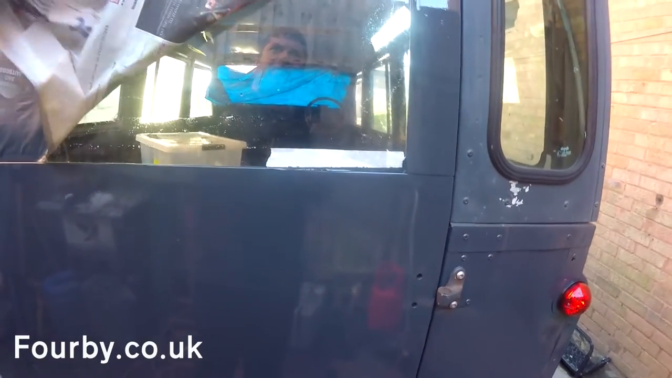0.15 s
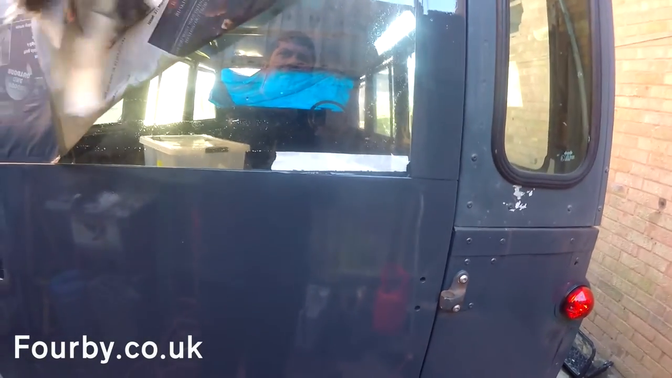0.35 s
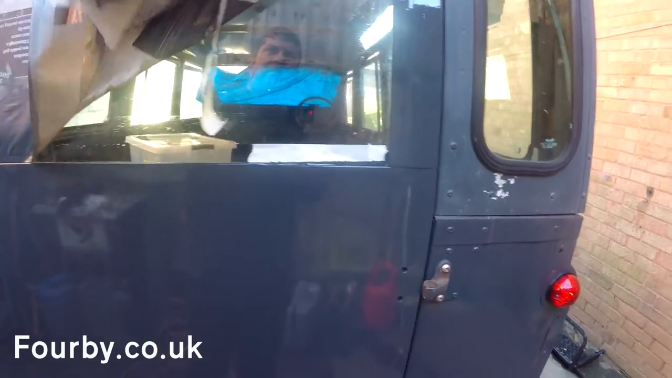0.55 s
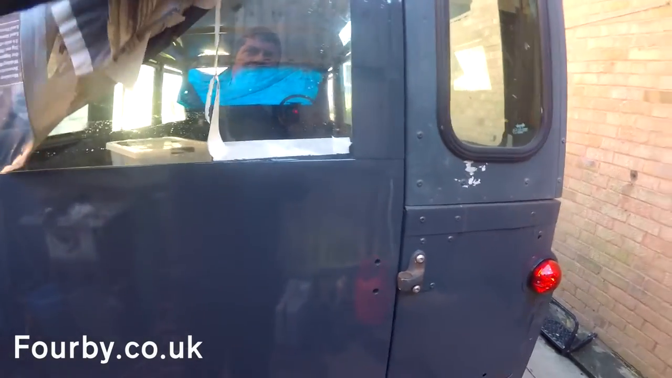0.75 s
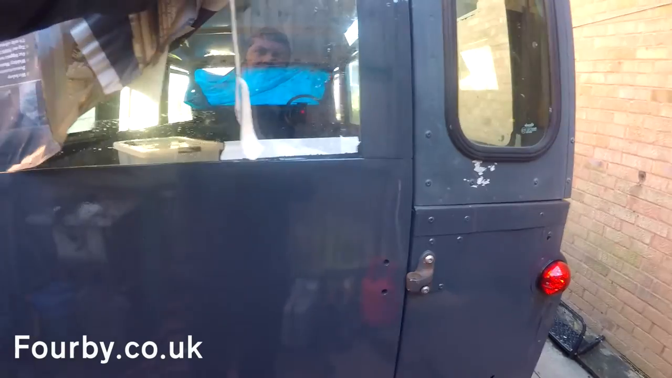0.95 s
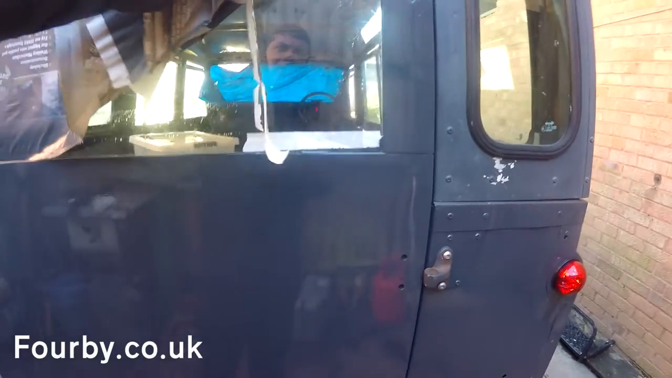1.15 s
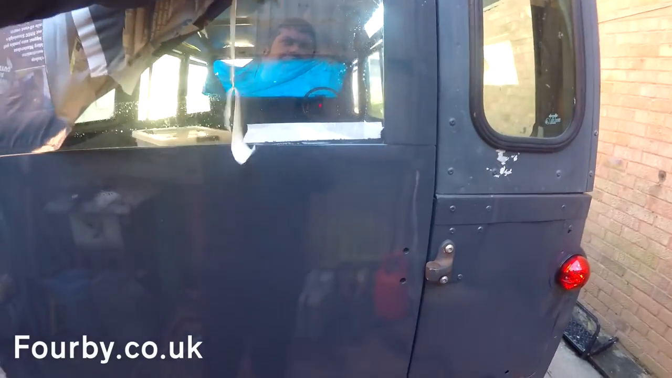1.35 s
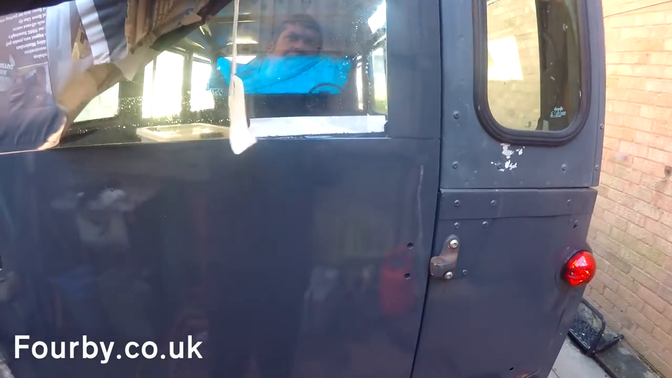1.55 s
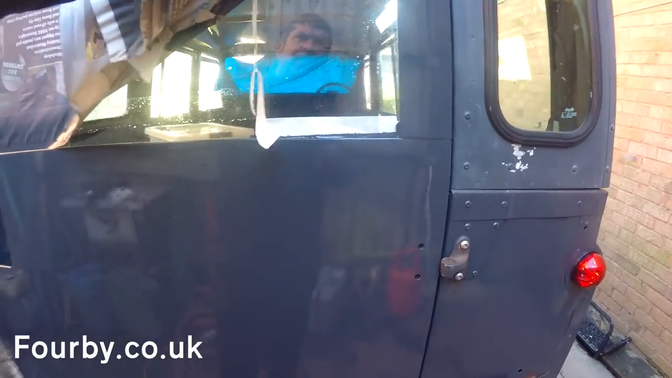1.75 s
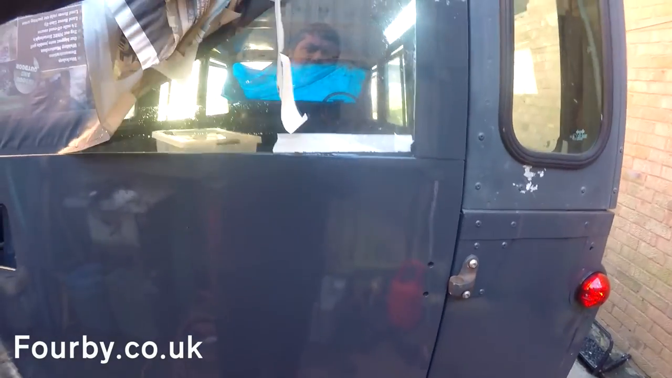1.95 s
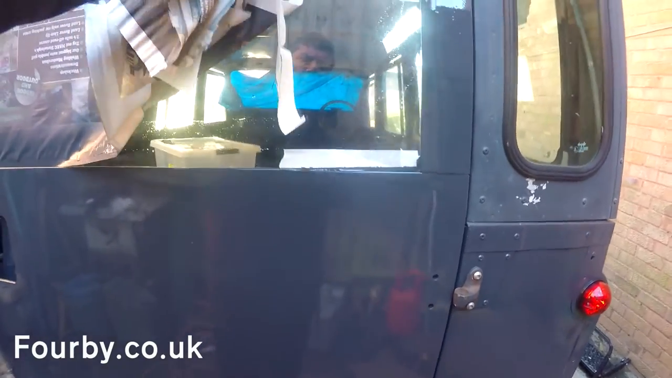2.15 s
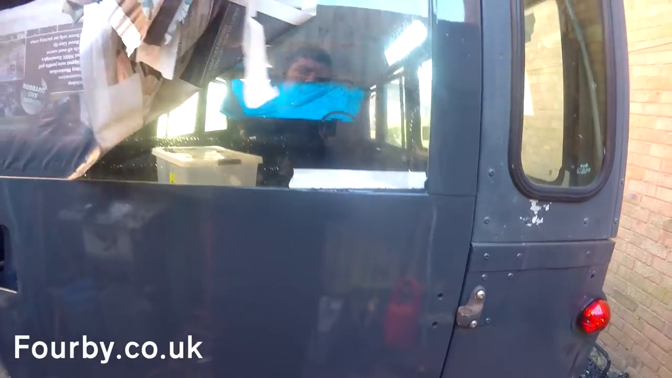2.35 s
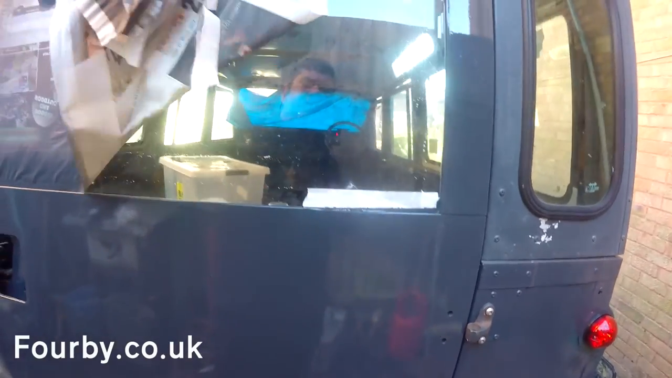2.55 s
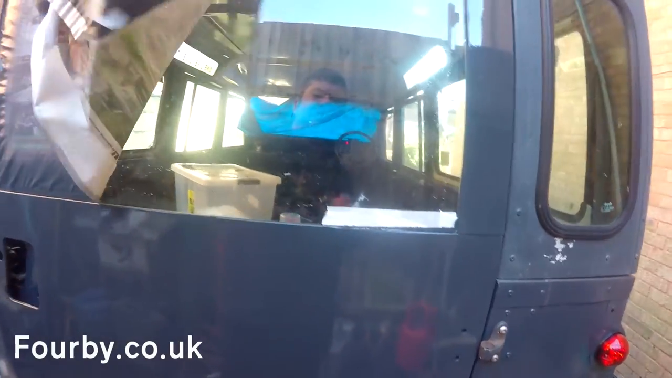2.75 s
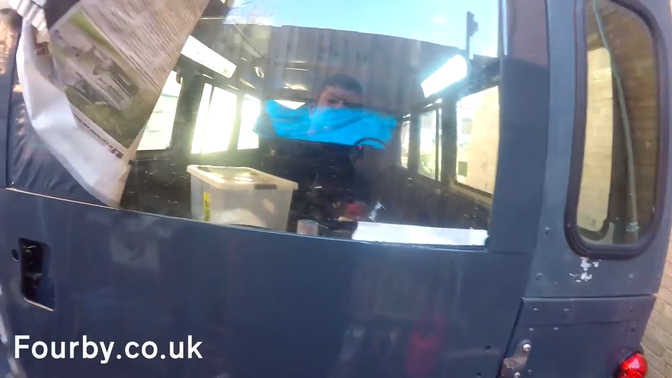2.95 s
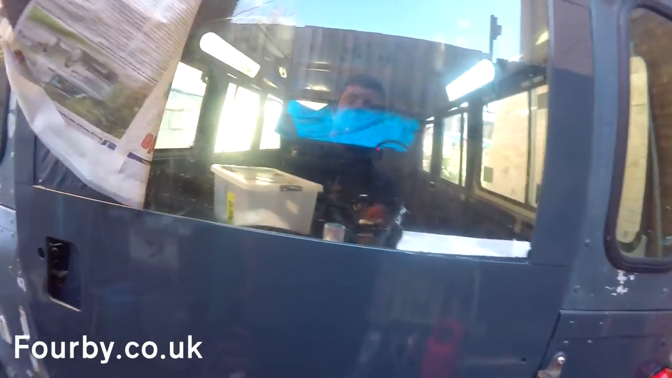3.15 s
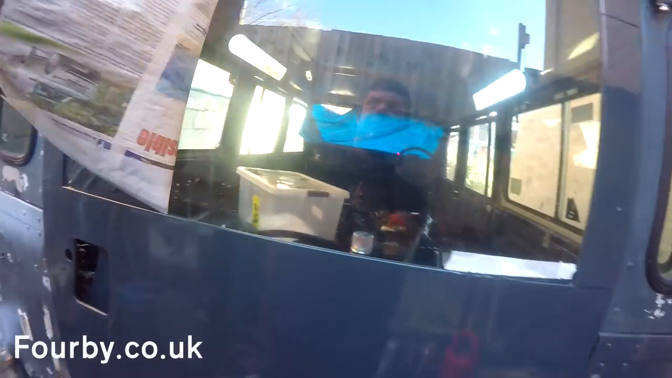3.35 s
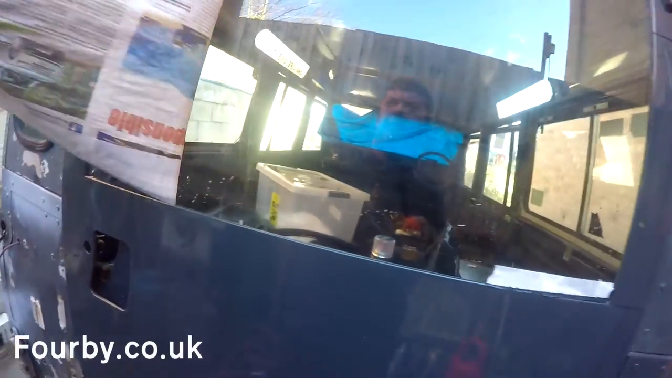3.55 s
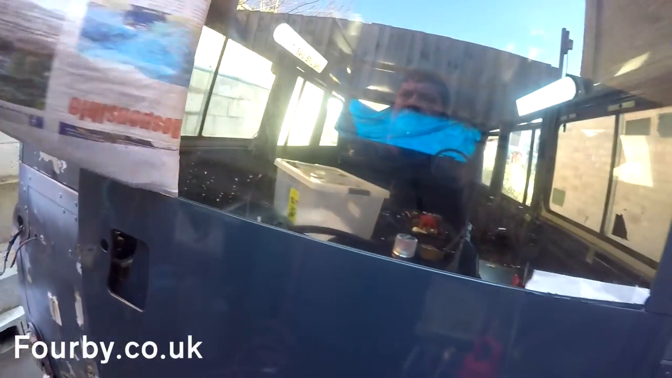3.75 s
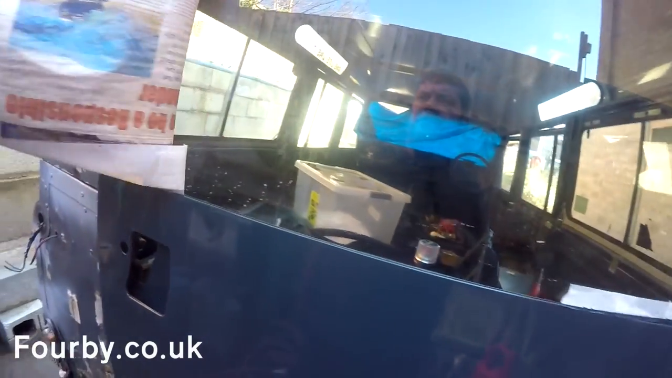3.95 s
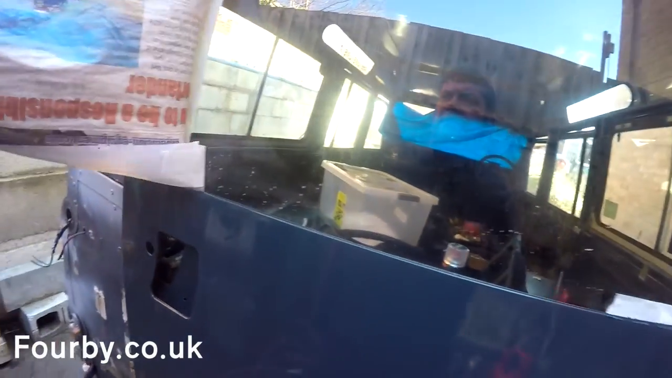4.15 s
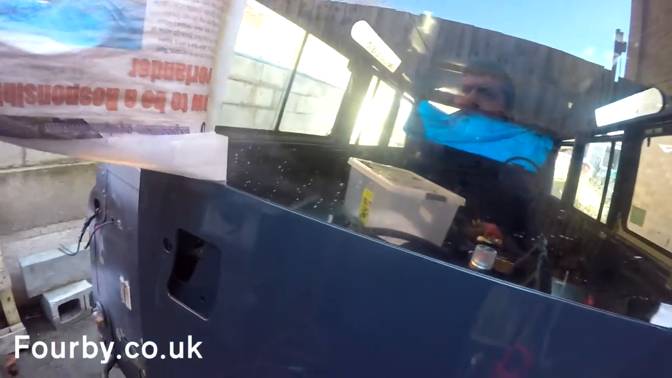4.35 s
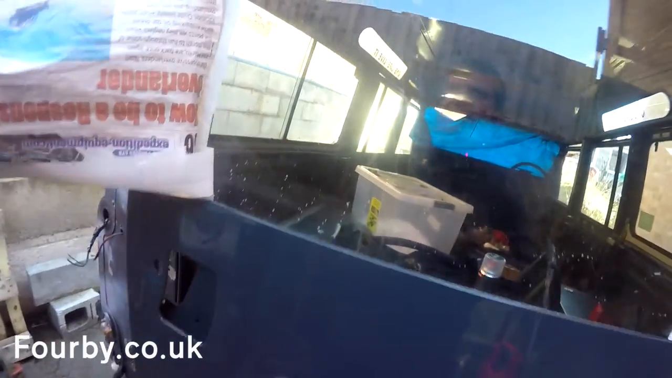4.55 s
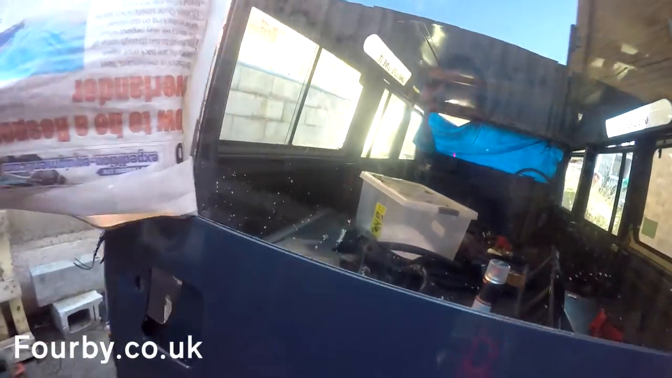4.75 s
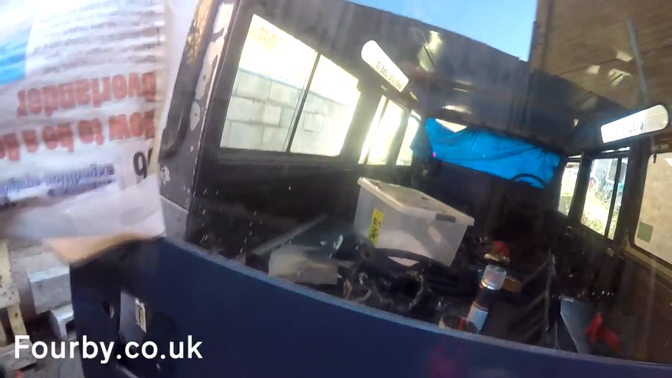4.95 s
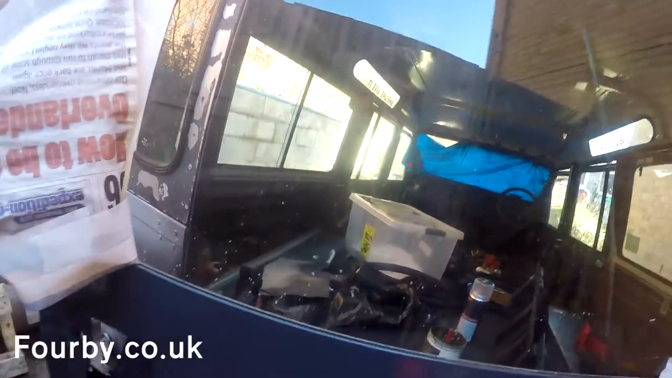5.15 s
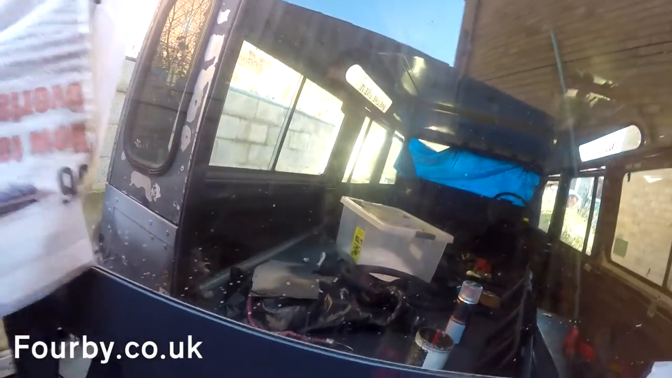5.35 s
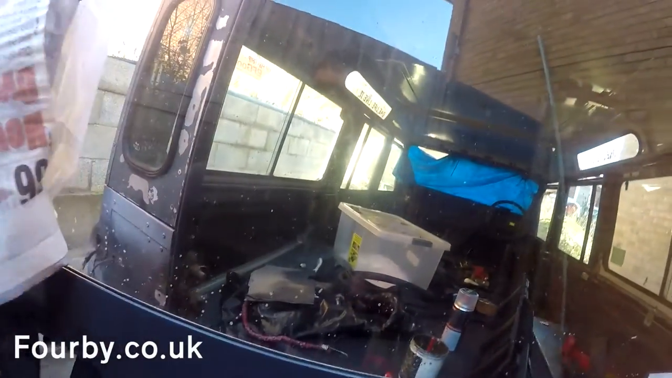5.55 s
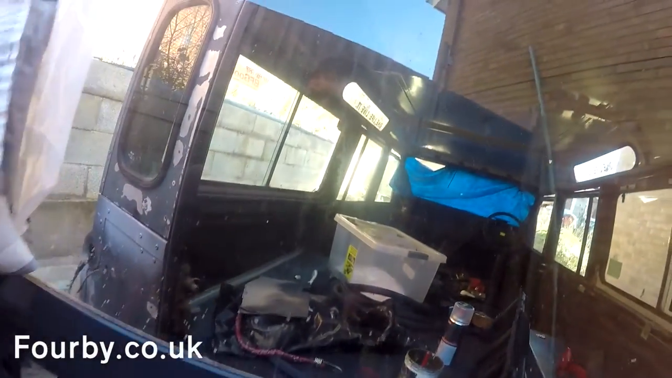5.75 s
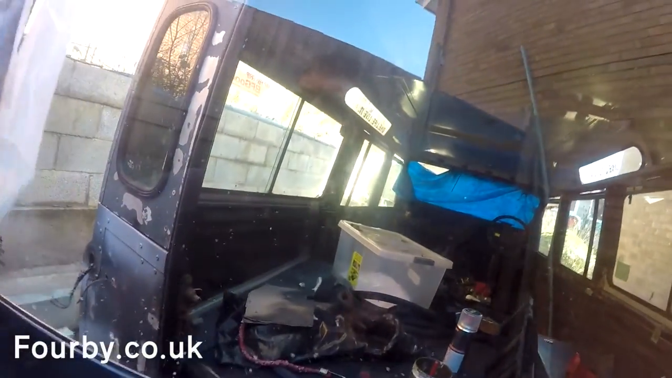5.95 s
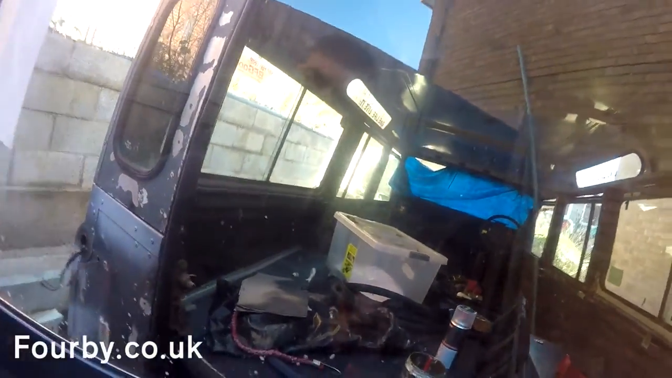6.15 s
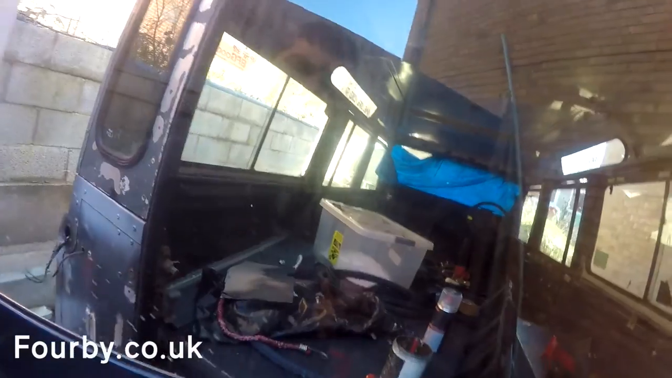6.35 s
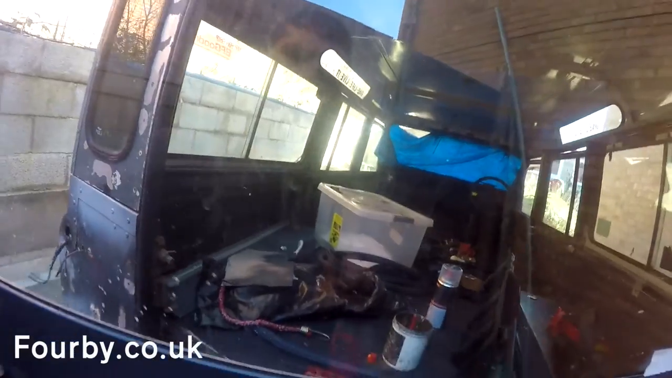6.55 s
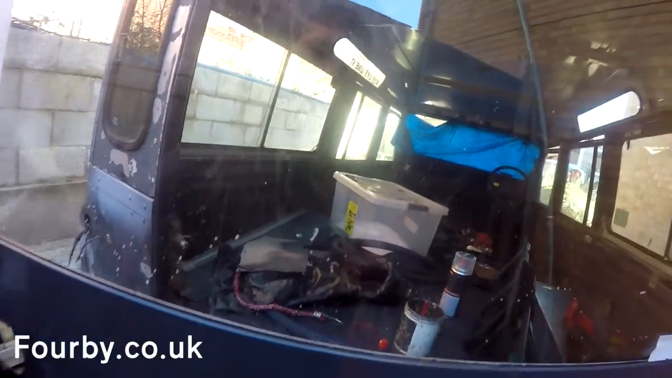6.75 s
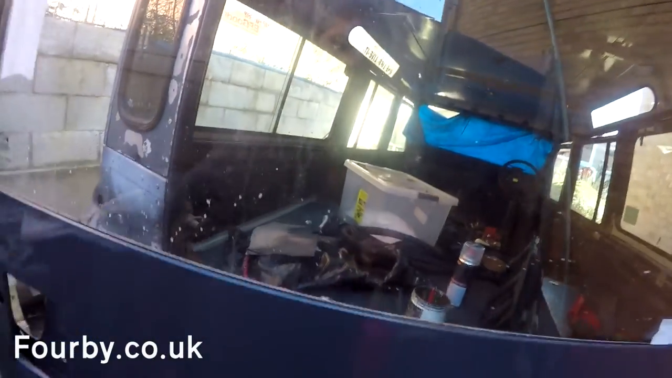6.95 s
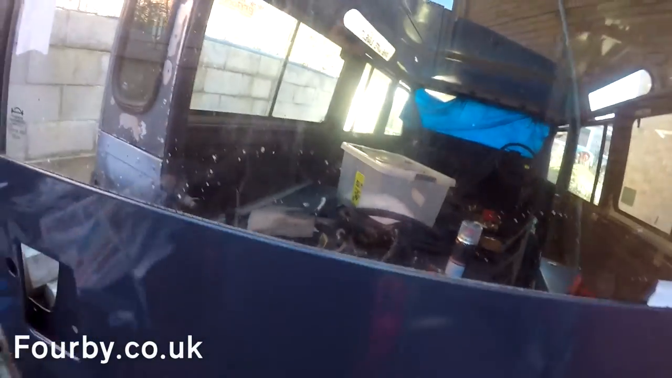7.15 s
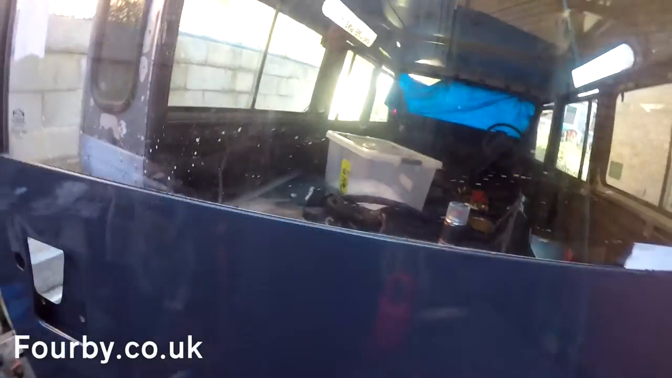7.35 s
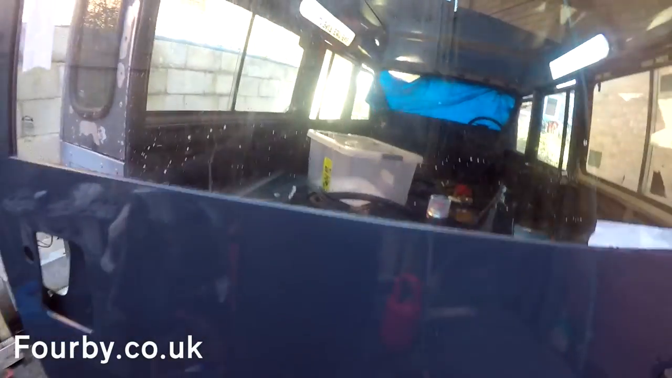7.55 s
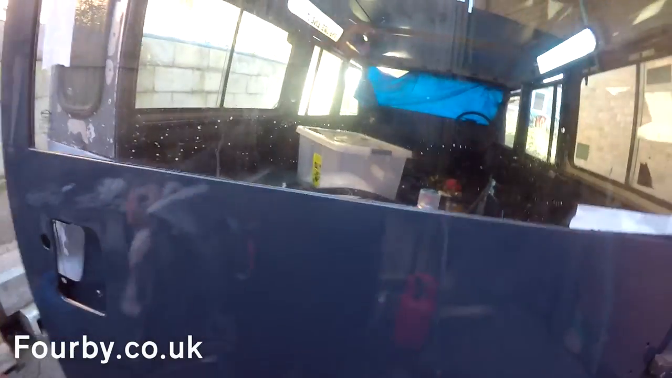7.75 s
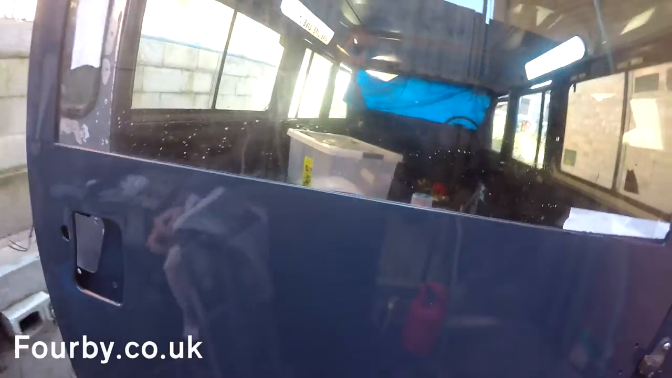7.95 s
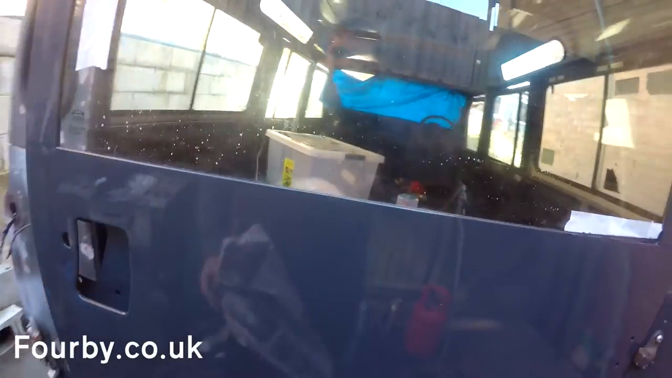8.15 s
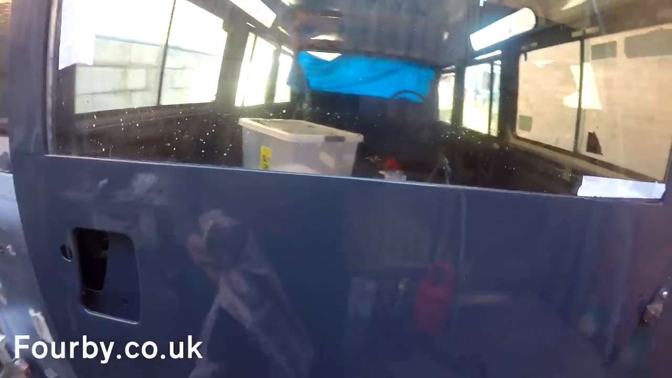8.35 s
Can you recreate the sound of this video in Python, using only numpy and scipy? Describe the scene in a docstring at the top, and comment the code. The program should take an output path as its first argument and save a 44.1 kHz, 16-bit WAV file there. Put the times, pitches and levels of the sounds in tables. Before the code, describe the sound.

Close to the microphone, newspaper masking is pulled off a painted van door and bunched by hand. A quick rustle and snap open, then sparse faint crinkles; from two seconds the rustling thickens with rips and cracks, peaking around six to seven seconds. It drops to near quiet with a faint hoarse squeak, then a last soft rustle. Low air rumble runs beneath, with slight short echo from nearby walls.

```python
"""A rustle of tiny paper buckles comes first, over a low rumble, soon joined by a rip and a snap.
Newspaper masking is pulled off a painted van door and bunched up by hand, close to the microphone.
Random buckles excite the sheet's resonances; creases are impulses that ring and disperse, and rips
are short runs of ticks. Filtered noise makes the rumble, decaying sines the puffs of air.
A faint squeak, a hoarse falling tone with one overtone, comes as the last paper slides off."""
import sys
import numpy as np
from scipy import signal
from scipy.fft import rfft, irfft, next_fast_len
from scipy.io import wavfile
from scipy.ndimage import uniform_filter1d, map_coordinates

SR = 44100
rng = np.random.default_rng(int(sys.argv[2]) if len(sys.argv) > 2 else 0)


def dump(signal):
    """Clip the signal to [-1, 1] and save it as 16-bit WAV at the path in sys.argv[1]."""
    limited = np.clip(np.atleast_2d(signal).T, -1, 1)
    pcm = np.round(limited * 32767).astype(np.int16)
    wavfile.write(sys.argv[1], SR, pcm)


N = 374459

# state of the sheet: t/s, tautness (0 hanging loose - 1 stretched on the door),
# crumpling (0 sliding - 1 being crushed)
SHEET_STATE = [(0, 0.81, .74), (1.1, 0.69, .6), (1.9, 0.48, 0.99), (2.25, 0.96, .9), (2.65, 0.71, .35),
               (3.1, 0.89, .85), (3.55, 0.82, .35), (4.05, 0.53, .16), (4.42, .64, .8), (5.8, .05, .75),
               (6.25, .05, .83), (6.78, 0.53, 0.98), (7.2, 0.82, .3), (7.7, .45, .05), (8.49, .75, .4)]
LOOSE_HZ, TAUT_HZ = 260, 814  # the sheet's drum note, slack and stretched


def amp(db):
    """Decibels to amplitude ratio."""
    return 10 ** (np.asarray(db) / 20)


def unit(x):
    """Normalisation to unit rms."""
    return x / np.sqrt(np.mean(x ** 2) + 1e-20)


def along(points, hz):
    """Interpolation of (f/Hz, value) points on a logarithmic frequency axis."""
    f, v = np.transpose(points)
    return np.interp(np.log(hz + 1), np.log(f), v)


def curves(rows):
    """Linear interpolation in time: one value per sample for each column after t/s."""
    s, *cols = np.transpose(rows)
    return [np.interp(np.arange(N) / SR, s, c) for c in cols]


def wobble(rate, size=N):
    """Band-limited fluctuation: a smooth curve through random knots, rate of them a second."""
    knots = rng.standard_normal(int(size * rate / SR) + 4)
    return map_coordinates(knots, [np.arange(size) * rate / SR])


def filtered(x, response):
    """Linear filtering: the spectrum of x times a complex response of frequency."""
    m = next_fast_len(len(x) + 4096)
    return irfft(rfft(x, m) * response(np.fft.rfftfreq(m, 1 / SR)), m)[:len(x)]


def coloured(x, spectrum):
    """Spectral shaping by (f/Hz, level/dB) points, then unit rms."""
    return unit(filtered(x, lambda hz: amp(along(spectrum, hz))))


def resonance(hz, centre_hz, q):
    """Damped mode: the response of a causal second-order band-pass."""
    return 1j * hz * centre_hz / (q * (centre_hz ** 2 - hz ** 2) + 1j * hz * centre_hz)


def add(track, s, sound):
    """Superposition: mixes a sound into the track from time s."""
    start = max(round(s * SR), 0)
    track[start:start + len(sound)] += sound[:max(len(track) - start, 0)]


def effort():
    """Energy of the hand: strokes rise, swell or ease, then decay; flutter, rustle, crinkle, fizz in dB."""
    # pulls and scrunches of the hand: start t/s, length/s, rustle level/dB, swell from start to end/dB,
    # then relative to the rustle: flutter level/dB, crinkle level/dB, fizz level/dB (all before layer trims)
    strokes = [(-.02, .13, -34.5, -2, -4, -0.5, -1.5), (0.164, .34, -44, -2.5, -4.5, -4.5, -6.5),
               (0.5, 0.29, -45.5, -1, -1.5, -5.5, -6.5), (0.823, 0.044, -50.5, 0.5, 6, 2.5, -3),
               (1.017, 0.034, -51, -2.5, 8, 8, 2.5), (1.199, 0.15, -45.5, -4.5, 0, -2, -3.5),
               (1.368, 0.12, -57.5, 2, -4, -4.5, -16), (1.525, 0.077, -52, -4, 2.5, -5.5, -6),
               (1.77, .13, -45.5, 10.5, -2.5, 4, -4), (1.954, 0.041, -36.5, 2, -7.5, -1, -3.5),
               (2.098, .22, -37, 3.5, -1, -0.5, -3.5), (2.329, 0.2, -37, 1, -0.5, 3, -2.5),
               (2.56, 0.46, -37.5, 1, -5, -2.5, -8.5), (3.051, .24, -35.5, 2.5, -2, -2.5, -8),
               (3.343, 0.77, -35.5, 1, -4, -2.5, -8.5), (4.077, 0.064, -37.5, 3.5, -2.5, -7.5, -19),
               (4.217, .11, -47, 19, -6, -4, -9), (4.37, 0.16, -39, 7, -1.5, -3.5, -10),
               (4.564, 0.24, -47, -2.5, -3, -4.5, -18), (4.805, .11, -36, 3, -6.5, -6, -19),
               (4.955, 0.036, -37, -3, 0, -7.5, -11.5), (5.081, 0.24, -34.5, 5, -5.5, -4.5, -9),
               (5.42, 0.051, -38, -2.5, -2.5, -4.5, -7), (5.556, .13, -49, 22.5, -4.5, -4.5, -6.5),
               (5.751, .22, -39.5, 4, -3, -5.5, -8), (5.811, .06, -31, -3.5, -2, -12, -12),
               (5.994, 0.099, -27, 3, -5, -5, -7.5), (6.11, 0.076, -30.5, -3.5, -0.5, -13, -10.5),
               (6.238, 0.041, -33.5, -3, -7, -4, -13), (6.349, 0.16, -35, -12, -3, -4, -6),
               (6.565, .28, -42.5, 5, 0, -1.5, -0.5), (6.854, .18, -48.5, 1, -4.5, -6, -19),
               (7.132, .38, -51.5, -9.5, -4, -4, -10), (7.5, 0.37, -60, -9, -9, -6, -20),
               (7.803, .32, -51.5, 10.5, -4, -5, -14), (7.923, 0.029, -43.5, 2, -6, -4.5, -3.5),
               (8.145, .35, -39, -9, -5, -7, -13)]
    # the hanging sheet between strokes, before layer trims: flutter, rustle, crinkle, fizz level/dB
    rest_db = (-57, -60.5, -71, -83)
    # settling after a stroke, the finest creases first: flutter, rustle, crinkle, fizz t60/s
    release_t60 = (0.32, 0.29, 0.27, 0.22)
    attack_s, attack_db = 0.016, 7  # a stroke gains this much in its first moments, out of a quick build-up
    t = np.arange(0, N / SR, .002)
    power = amp(rest_db)[:, None] ** 2 * np.ones(len(t))
    for s, length, db, swell_db, flutter_db, crinkle_db, fizz_db in strokes:
        rising = np.maximum(1 - (t - s) / attack_s, 0)
        progress = np.clip((t - s) / length, 0, 1)
        settled = np.maximum(t - s - length, 0) / np.array(release_t60)[:, None]
        level_db = db - attack_db * rising + swell_db * (progress - .5) - 60 * settled
        layer_db = level_db + [[flutter_db], [0], [crinkle_db], [fizz_db]]
        power = power + amp(layer_db) ** 2
    return curves(np.column_stack([t, *(10 * np.log10(power))]))


def buckles(size, rate, spread_db, rub_db):
    """Impulsive excitation: tiny uneven buckles, on average rate a second, over rubbing hiss."""
    sizes = amp(spread_db * np.minimum(rng.standard_normal(size), 2)) * rng.choice([-1, 1], size)
    ticks = sizes * (rng.random(size) < rate / SR)
    return unit(unit(ticks) + amp(rub_db) * rng.standard_normal(size))


def avalanches(size, rate, spread_db, t60):
    """Cascade: the gain jumps whenever one buckle sets off its neighbours, then decays."""
    sizes = amp(spread_db * np.minimum(rng.standard_normal(size), 1.5))
    starts = sizes * (rng.random(size) < rate / SR)
    return unit(1 + signal.lfilter([1], [1, -amp(-60 / (t60 * SR))], starts))


def patchy(x, depth_db):
    """Time-varying response: changing folds favour other frequencies from moment to moment."""
    z = signal.stft(x, nperseg=256)[2]
    field = rng.standard_normal(z.shape)
    for axis in (0, 1):
        field = uniform_filter1d(field, size=5, axis=axis)
    return signal.istft(z * amp(depth_db * unit(field)), nperseg=256)[1][:len(x)]


def bending(hz, delay, at_hz):
    """Bending-wave dispersion: at_hz arrives after the delay, higher notes sooner, lower ones later."""
    return np.exp(-4j * np.pi * delay * np.sqrt(hz * at_hz))


def drumming(knocks, taut, q=1.41, broad_db=-5):
    """Membrane resonance: buckles drum the sheet, hollow while stretched, deep once it hangs loose."""
    # colour of the flutter: f/Hz, relative level/dB
    flutter_colour = [(60, -32), (130, 0.5), (220, -1.5), (400, 2), (700, -2), (1000, -3.5), (2000, -34)]
    low = unit(filtered(knocks, lambda hz: resonance(hz, LOOSE_HZ, q)))
    high = unit(filtered(knocks, lambda hz: resonance(hz, TAUT_HZ, q)))
    broad = coloured(filtered(knocks, lambda hz: 1j), flutter_colour)  # a quarter-cycle phase shift
    drummed = np.sqrt(1 - taut) * low + np.sqrt(taut) * high + amp(broad_db) * broad
    return coloured(drummed, flutter_colour)


def rustling(drive, crisp_db, even_db=-3, range_db=4, tilt_db=4):
    """Radiator size sets pitch: broad facets sound dull; as small creases join, the rustle moves up."""
    # colour of the rustle: f/Hz, relative level/dB
    rustle_colour = [(350, -41), (650, -5.5), (900, -1.5), (1600, 1), (2600, 1), (3300, -1), (4300, -2),
                     (8000, -37)]
    small = .5 + .5 * np.tanh((crisp_db - even_db) / range_db)
    tilt = lambda hz: amp(tilt_db * np.log2(np.clip(hz, 700, 4000) / 1700))  # tilt_db per octave
    dull = coloured(filtered(drive, lambda hz: 1 / tilt(hz)), rustle_colour)
    bright = coloured(filtered(drive, tilt), rustle_colour)
    return unit((1 - small) * dull + small * bright)


def sheet():
    """Forced vibration: buckles drive the sheet, facets and small creases, most clumped when crushed."""
    # colours of the two finest layers: f/Hz, relative level/dB
    crinkle_colour = [(1800, -8.5), (3000, -1.5), (3800, -1.5), (4800, 1.5), (6300, -1), (7500, -8),
                      (10000, -28)]
    fizz_colour = [(5000, -24), (7000, -1), (8200, 0), (11000, -2.5), (15000, -4.5)]
    flutter_db, rustle_db, crinkle_db, fizz_db = effort()
    taut, crumpling = np.clip(curves(SHEET_STATE), 0, 1)
    clumps = amp(2.3 * wobble(45)) * avalanches(N, rate=130, spread_db=5, t60=0.015) ** crumpling
    grain = buckles(N, rate=1800, spread_db=4.5, rub_db=-3)
    drive = patchy(clumps * grain, depth_db=2.5)
    drive = filtered(drive, lambda hz: bending(hz, delay=0.000295, at_hz=2980))
    # the flutter has sparser buckles of its own, in the same clumps
    knocks = clumps * buckles(N, rate=400, spread_db=1.5, rub_db=-1.5)
    flutter = amp(flutter_db - 1.3) * drumming(knocks, taut)
    rustle = amp(rustle_db - 0.12) * rustling(drive, crinkle_db - rustle_db)
    # the smallest creases have quick runs of their own
    fine = drive * avalanches(N, rate=110, spread_db=9, t60=0.013) ** crumpling
    crinkle = amp(crinkle_db - 0.04) * coloured(filtered(fine, lambda hz: 1j), crinkle_colour)
    fizz = amp(fizz_db + 0.54) * coloured(fine, fizz_colour)
    return flutter + rustle + crinkle + fizz


def rumble():
    """Low-frequency turbulence: lumps of moving air and handling noise, over a faint low drone."""
    # colour of the rumble: f/Hz, relative level/dB
    rumble_colour = [(12, -13.5), (25, 4.5), (42, -1), (60, -0.5), (80, 0), (105, -7), (150, -11.5),
                     (300, -46)]
    # swings that push air past the microphone: t/s, peak level/dB
    gusts = [(.52, -35.5), (.85, -40), (1.04, -36.5), (1.3, -49), (1.63, -40.5), (1.85, -42), (2.33, -42),
             (3.97, -35), (4.12, -38), (4.92, -36.5), (6.03, -40), (6.23, -35.5), (6.47, -37), (6.72, -37),
             (6.85, -34.5), (8.21, -39)]
    still_air_db, gust_s = -48.5, 0.071  # the rumble between swings; half the length of a swing
    handling_db, handling_follows = -45, 0.48  # working arms; dB per dB of flutter about its mean
    t, flutter_db = np.arange(N) / SR, effort()[0]
    swings = sum(amp(db) ** 2 * np.exp(-((t - s) / gust_s) ** 2) for s, db in gusts)
    handling = amp(handling_db + handling_follows * (flutter_db - flutter_db.mean()))
    level = np.sqrt(amp(still_air_db) ** 2 + handling ** 2 + swings)
    lumpy_noise = rng.standard_normal(N) * amp(1.6 * wobble(12))
    air = level * coloured(lumpy_noise, rumble_colour)
    drone = unit(filtered(rng.standard_normal(N), lambda hz: resonance(hz, centre_hz=76.6, q=6.4) ** 2))
    return air + amp(-57.0) * drone


def facet(hz, centre_hz, q, steepening=0.15):
    """Plate resonance of the paper between creases: the more it rings, the steeper its skirts."""
    q = max(q, .3)
    steepness = 1 + steepening * q
    return resonance(hz, centre_hz, q / steepness) ** steepness


def rips(rise=0.0024, fall_t60=0.0069):
    """Successive fracture: fibres and glue give way in fast ticks that ring the nearest facet."""
    # paper and tape giving way or dragging in a run: t/s, length/s, level before trim and envelope/dB,
    # centre f/Hz, nominal Q
    rip_runs = [(0.033, .045, -28.5, 2700, 1.1), (0.317, 0.0042, -28, 1070, 0.74),
                (0.515, 0.014, -29.5, 2000, .4), (1.025, 0.016, -25.5, 5260, 2.2),
                (2.18, 0.086, -35.5, 636, 4.1), (2.256, 0.016, -27, 800, 2.6),
                (2.516, 0.042, -30.5, 2760, 2.3), (2.879, 0.021, -28.5, 2570, 1.2),
                (3.058, 0.028, -29.5, 1660, 0.49), (3.363, 0.014, -22.5, 360, 0.83),
                (3.463, 0.57, -39.5, 3130, 5.4), (3.853, 0.3, -40.5, 710, 4.5),
                (4.424, 0.018, -37, 480, 1.8), (4.735, 0.02, -34.5, 1170, 1.9),
                (5.077, 0.021, -25.5, 1290, 0.57), (5.258, 0.035, -28.5, 1100, 0.51),
                (5.342, 0.0084, -29, 835, 1.2), (5.675, 0.023, -31, 1290, 0.56),
                (5.812, 0.039, -31, 340, 1), (6.022, 0.034, -16.5, 2100, 1.7),
                (6.089, 0.021, -21.5, 4220, 0.34), (6.339, 0.026, -28, 1460, .45),
                (6.388, 0.02, -28, 1500, 0.31), (6.69, 0.016, -26.5, 5470, 0.37),
                (6.718, 0.021, -21.5, 3930, 0.52), (6.765, 0.0092, -21.5, 2000, .31),
                (6.817, 0.013, -22.5, 1810, .21), (7.305, 0.048, -51.5, 3750, 5.5),
                (7.817, .033, -48, 1100, 2)]
    track = np.zeros(N)
    for s, length, db, centre_hz, q in rip_runs:
        t = np.arange(int((length + 0.045) * SR)) / SR
        shape = (1 - np.exp(-t / rise)) * amp(-60 * np.maximum(t - length, 0) / fall_t60)
        ticks = buckles(len(t), rate=2200, spread_db=4, rub_db=-2)
        ticks = ticks * avalanches(len(t), rate=220, spread_db=4, t60=.006)
        ring = filtered(ticks, lambda hz: facet(hz, centre_hz, q) * bending(hz, delay=0.000303, at_hz=3000))
        add(track, s, amp(db - 1.04) * shape * unit(ring))
    return track


def small_snaps(count):
    """Random failure under strain: lesser creases go most often while crushed, as hard as the hand works."""
    over_crinkle_db, spread_db, flap_below_db = 10.5, 3, -16.5  # crack over crinkle; scatter; flap re crack
    middle_hz, octaves, q = 3230, 0.41, 1.43  # their ring, its scatter and its nominal sharpness
    _, _, crinkle_db, _ = effort()
    _, crumpling = np.clip(curves(SHEET_STATE), 0, 1)
    strain = np.cumsum(crumpling ** 2)
    # one crease in each equal share of the strain
    at = np.searchsorted(strain, strain[-1] * (np.arange(count) + rng.random(count)) / count)
    size, pitch = np.clip(rng.standard_normal((count, 2)), -2, 2).T
    crack_db = crinkle_db[at] + over_crinkle_db + spread_db * size
    ring_hz = middle_hz * 2 ** (octaves * pitch)
    return [(s, db, hz, q, db + flap_below_db) for s, db, hz in zip(at / SR, crack_db, ring_hz)]


def snaps(flap_q=1.8, travel=0.00162, scatter_db=-7, scatter_t60=0.011):
    """Impulse response with dispersion: a crease cracks and rings; the low notes cross the sheet last."""
    # creases heard one by one, loud and faint: t/s, crack level/dB (rms over a millisecond, before trim),
    # ring f/Hz, nominal ring Q, level of the sheet's flap/dB (likewise)
    single_snaps = [(0.053, -17.5, 5500, 1.7, -30), (0.3361, -19.5, 4150, 3.1, -40),
                    (0.5953, -24, 3400, 4.6, -34), (1.0239, -19, 4860, 5.7, -36),
                    (1.157, -37, 6000, 0.7, -55), (1.2138, -32, 4550, .71, -46),
                    (1.2885, -34, 6640, .36, -52), (1.311, -29, 6230, 0.37, -51),
                    (1.7786, -26, 3550, 1.5, -57), (1.8312, -28, 3320, 2.4, -49),
                    (1.8622, -18, 3530, 2, -48), (1.8903, -16, 2770, 1.2, -48),
                    (1.9593, -22.5, 2420, 0.87, -48), (2.0818, -16, 3520, 1.1, -20),
                    (2.1112, -21.5, 4270, 1.7, -28), (2.1677, -18.5, 4010, 3.1, -27),
                    (2.1824, -34, 4000, .95, -19), (2.2233, -22, 2270, 0.72, -33),
                    (2.2665, -26, 1100, 1.5, -23), (2.469, -19, 2900, .88, -37),
                    (2.531, -21, 3530, 1.4, -24), (2.892, -11.5, 4340, 4.7, -39),
                    (3.0089, -24, 2600, 0.76, -28), (3.0728, -22.5, 1140, 0.41, -37),
                    (3.1375, -24, 1210, .4, -26), (3.1742, -18.5, 3000, 1.8, -23),
                    (3.3655, -13, 1470, 2.1, -18), (3.4916, -18.5, 3120, 2.9, -32),
                    (3.6749, -15.5, 4800, .7, -48), (3.7848, -21.5, 2580, 1.2, -25.5),
                    (4.1285, -24.5, 3340, 2.5, -26), (4.1632, -26.5, 4010, 2.2, -41),
                    (4.3265, -22.5, 3500, 0.32, -46), (4.3769, -12, 2750, 2.5, -38),
                    (4.3786, -13, 3000, 2.4, -23), (4.3813, -13.5, 1880, 0.27, -20),
                    (4.4178, -15.5, 2600, 4, -13.5), (4.4364, -23, 2580, .49, -17),
                    (4.4732, -22.5, 4840, 1.3, -41), (4.4868, -18.5, 3120, 4.1, -23),
                    (4.5491, -23.5, 5700, 4, -42), (4.6036, -20.5, 1970, 0.93, -36),
                    (4.8783, -17.5, 1550, 3.8, -44), (4.891, -17.5, 570, .36, -26),
                    (5.277, -14.5, 2000, 3.1, -30), (5.4733, -21.5, 2000, 2.1, -30),
                    (5.6438, -26.5, 500, .35, -36), (5.6792, -12.5, 4130, .85, -38),
                    (5.767, -19.5, 1200, 0.83, -18.5), (5.8159, -10.5, 1300, 1.4, -9.5),
                    (5.9872, -14, 4270, .26, -40), (5.9933, -14, 11000, .44, -31),
                    (6.02, -13, 2580, 0.31, -15.5), (6.0341, -11, 6230, .83, -19),
                    (6.1568, -20, 2130, 4, -20), (6.2187, -22, 2580, 0.29, -38),
                    (6.244, -14.5, 1770, .8, -17.5), (6.2995, -31, 3320, 1.6, -46),
                    (6.3509, -16.5, 1430, 0.72, -34), (6.4716, -16.5, 890, 0.78, -42),
                    (6.771, -19, 3120, 0.66, -30), (6.7808, -10, 5850, 0.94, -22),
                    (6.7845, -8.5, 3800, 0.83, -19.5), (6.8285, -8, 4700, 13, -38),
                    (6.9872, -37, 3730, 5.9, -54), (7.5057, -39, 4270, 1.8, -56),
                    (7.9572, -27, 1770, 1.4, -50), (8.0598, -28.5, 3740, 3.8, -52)]
    # a stiff crease ticks just before it gives way: how early/s, how much softer, above which crack level
    lead_s, lead_db, stiff_db = .003, -11, -16
    track, t = np.zeros(N), np.arange(2048) / SR
    millisecond = np.sqrt(SR / 1000 / len(t))  # gives a unit-rms sound the energy of one millisecond
    kick = unit(1. * (t == 0))
    taut, _ = np.clip(curves(SHEET_STATE), 0, 1)
    for s, crack_db, ring_hz, q, flap_db in list(single_snaps) + small_snaps(count=190):
        flap_hz = LOOSE_HZ * (TAUT_HZ / LOOSE_HZ) ** taut[round(s * SR)]
        # neighbouring folds scatter the crack
        scatter = unit(rng.standard_normal(len(t)) * amp(-60 * t / scatter_t60))
        reach = np.exp(0.24 * rng.standard_normal())  # relative distance travelled
        near = lambda hz: facet(hz, ring_hz, q) * bending(hz, delay=0.000392 * reach, at_hz=2970)
        flap_mode = lambda hz: resonance(hz, flap_hz, flap_q) / (1 + (hz / 1500) ** 2)
        far = lambda hz: flap_mode(hz) * bending(hz, travel * reach, at_hz=405)
        crack = unit(filtered(kick + amp(scatter_db) * scatter, near))
        flap = unit(filtered(kick, far))
        add(track, s, millisecond * (amp(crack_db + 0.94) * crack + amp(flap_db - 2.0) * flap))
        if crack_db > stiff_db:
            early_tick = unit(filtered(scatter, near))
            add(track, s - lead_s, millisecond * amp(crack_db + lead_db) * early_tick)
    return track


def walls(x):
    """Reverberation: the door and the brick walls answer briefly, with a decay for each frequency."""
    # decay of the echo: f/Hz, t60/s
    wall_decay = [(150, 0.28), (1500, 0.19), (6000, 0.073), (15000, 0.13)]
    hz, t, z = signal.stft(rng.standard_normal(SR // 3), SR, nperseg=256)
    decay = amp(-60 * t / along(wall_decay, hz)[:, None])
    tail = signal.istft(z * decay, SR, nperseg=256)[1]
    delayed = np.pad(x, (180, 0))  # samples before the echo begins
    return signal.fftconvolve(delayed, tail / np.linalg.norm(tail))[:N]


def puffs():
    """Air displacement: the swinging sheet pushes air at the microphone, a low swing that soon dies."""
    # puffs of air: t/s, initial amplitude/dB, nominal f/Hz, t60/s
    puff_events = [(0.886, -28.5, 132, 0.099), (1.023, -32, 107, 0.1), (2.968, -20.5, 192, 0.014),
                   (3.371, -19.5, 121, .04), (4.109, -34.5, 80, 0.087), (5.818, -16, 262, 0.027),
                   (6.354, -20.5, 138, 0.018), (6.472, -21.5, 69.6, .07), (6.769, -19.5, 128, 0.036),
                   (6.832, -23, 99, 0.25)]
    track, t = np.zeros(N), np.arange(SR // 4) / SR
    for s, db, hz, t60 in puff_events:
        phase = 2 * np.pi * np.cumsum(hz * np.exp(0.13 * wobble(120, len(t)))) / SR
        add(track, s, amp(db - 60 * t / t60) * np.sin(phase))
    return track


def squeak(rough=.052, overtone_db=-8):
    """Stick-slip friction of paper on paint: a faint hoarse note that sinks as the slide slows."""
    # the slide: t/s, length/s, nominal first f/Hz, nominal last f/Hz, level/dB
    slide = (7.5, .34, 1851.5, 1579, -60)
    s, length, first_hz, last_hz, db = slide
    track, u = np.zeros(N), np.linspace(0, 1, int(length * SR))
    hz = (first_hz + (last_hz - first_hz) * u) * (1 + rough * wobble(900, SR)[:len(u)])
    phase = 2 * np.pi * np.cumsum(hz) / SR
    tone = np.sin(phase) + amp(overtone_db) * np.sin(2 * phase)
    add(track, s, amp(db) * unit(np.sqrt(u * (1 - u)) * tone))
    return track


def scene():
    """Superposition of the paper close by, its faint echo, and the moving air."""
    paper = sheet() + snaps() + rips() + squeak()
    return (paper + amp(-16.5) * walls(paper) + puffs() + rumble())[None]


def record(dry):
    """Clipping and band limitation: peaks stop at full scale, then the highest treble is removed."""
    top_hz = 15550
    return np.array([filtered(np.clip(x, -1, 1), lambda hz: hz < top_hz) for x in dry])


dry = scene()
out = record(dry)
dump(out)
```